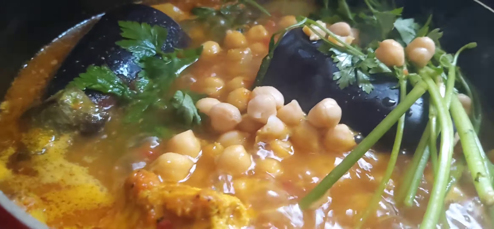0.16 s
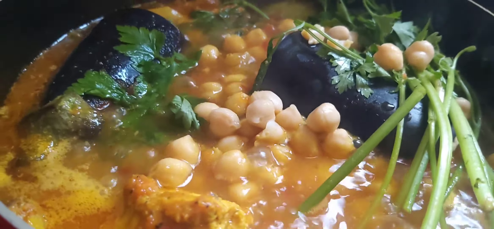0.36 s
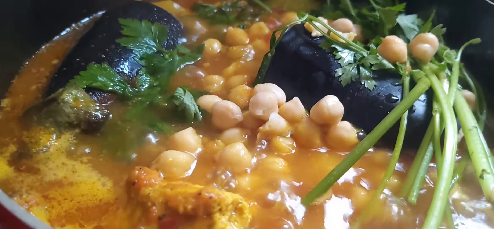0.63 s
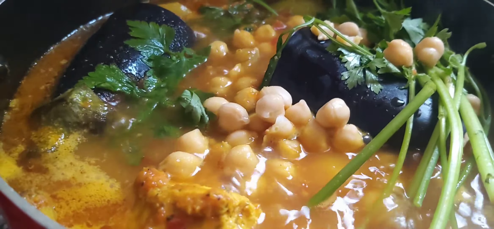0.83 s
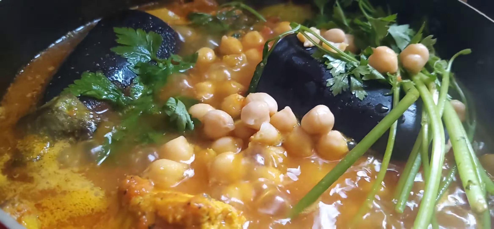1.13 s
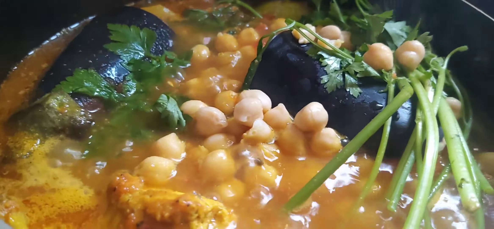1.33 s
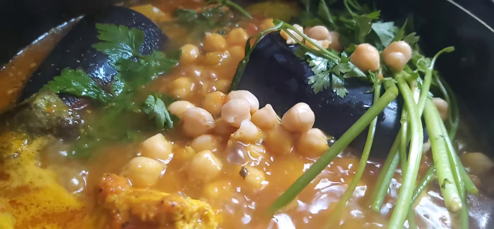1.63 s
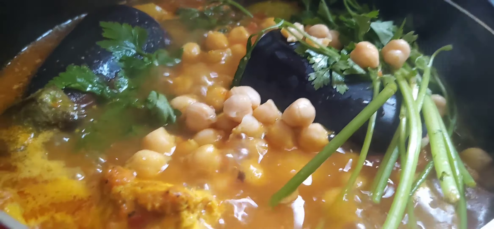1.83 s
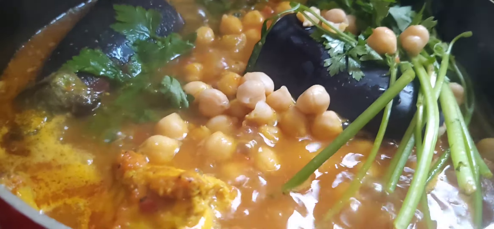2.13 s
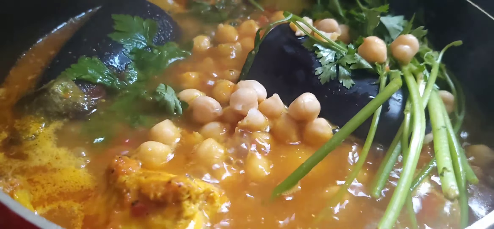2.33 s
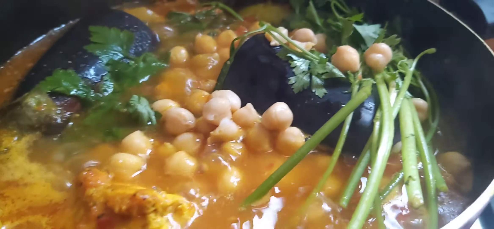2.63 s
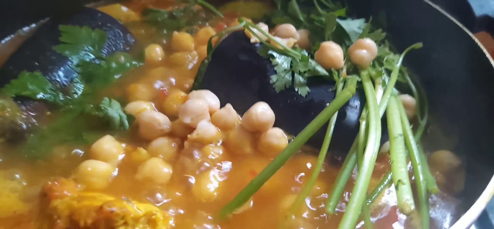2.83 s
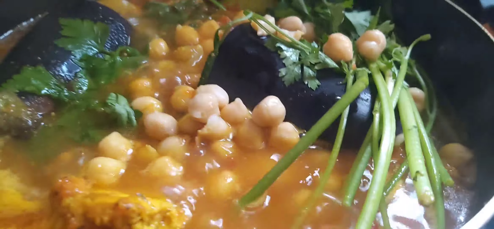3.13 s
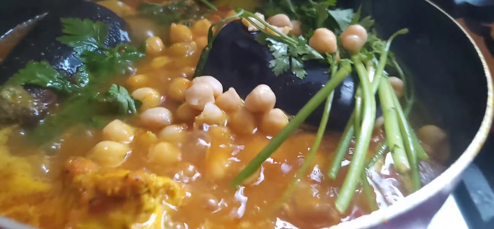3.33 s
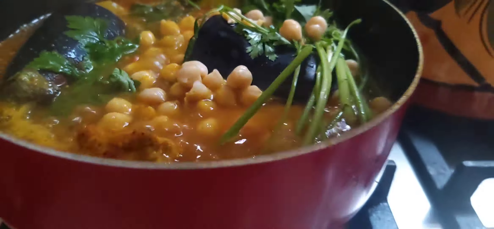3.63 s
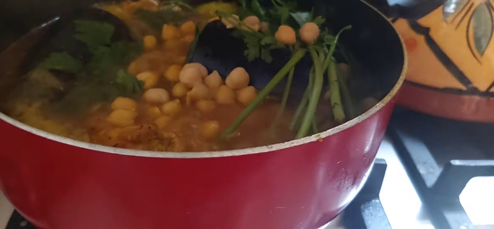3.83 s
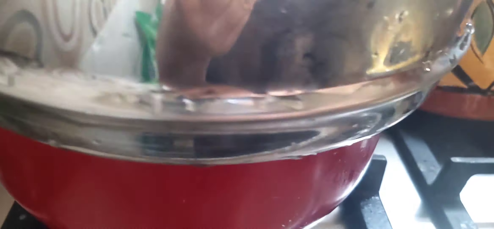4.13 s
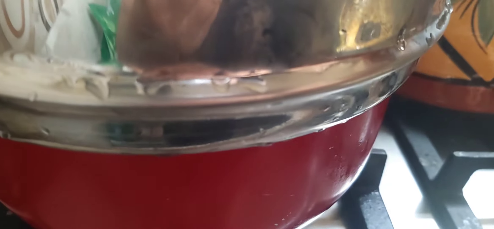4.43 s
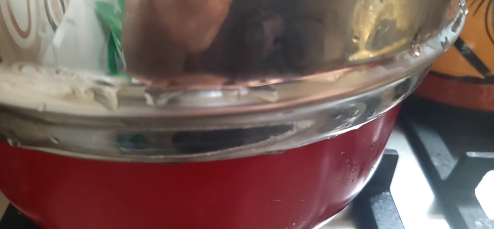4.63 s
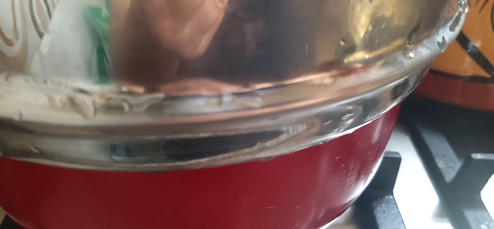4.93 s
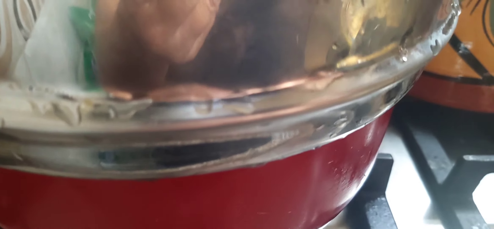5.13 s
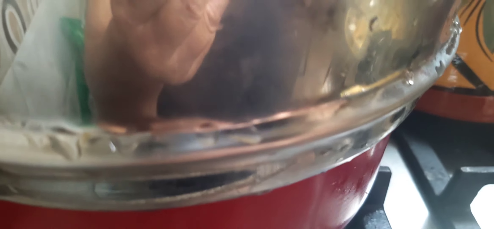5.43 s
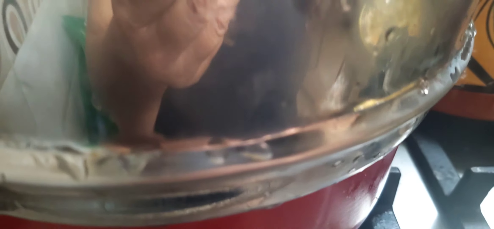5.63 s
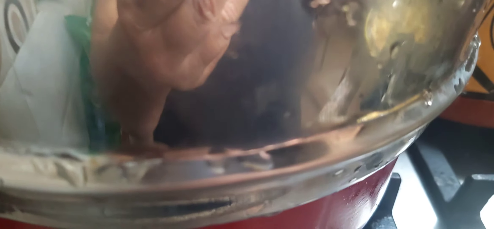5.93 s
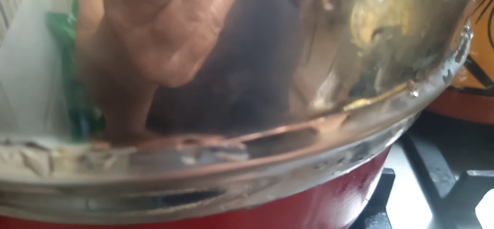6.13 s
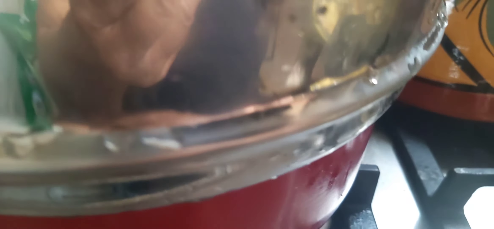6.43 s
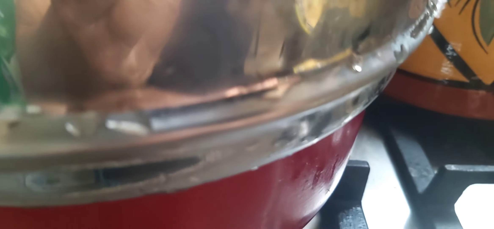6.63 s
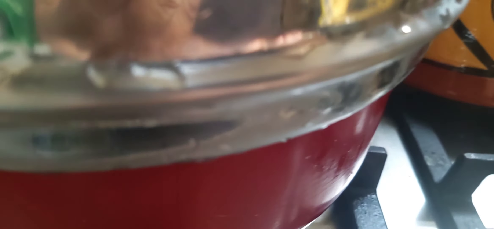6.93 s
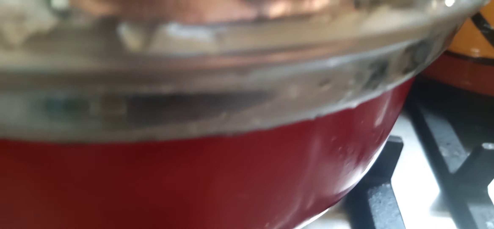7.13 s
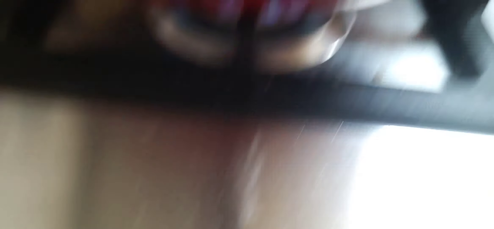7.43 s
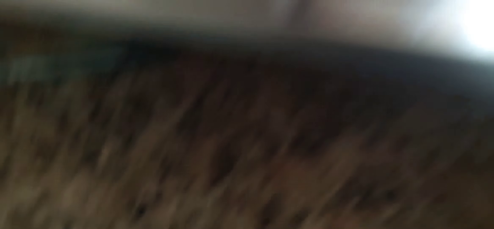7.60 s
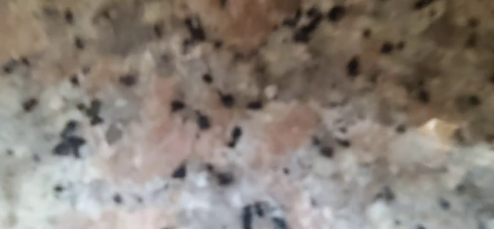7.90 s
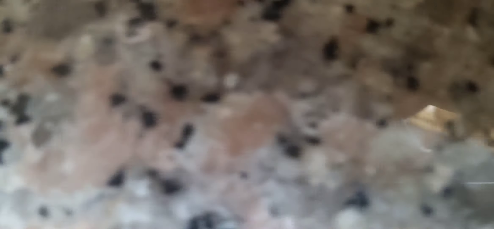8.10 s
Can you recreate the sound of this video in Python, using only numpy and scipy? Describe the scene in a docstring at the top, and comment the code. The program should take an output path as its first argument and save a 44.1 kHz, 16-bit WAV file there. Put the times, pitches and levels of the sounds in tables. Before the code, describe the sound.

A thick broth boils vigorously, very close, in a small kitchen with short tiled reflections. A dense bed of small bubbles, low churning and fine fizz runs throughout, with irregular wet plops, each a brief tone rising in pitch. Around 0.2 and 0.6-0.7 s steel slides faintly on steel; a light metallic knock comes at 1.6 s. At 1.96 s two or three very close blows make a hard, bright clank that dies within a quarter second. Soft grainy rubs and bumps follow at 2.5-2.7 s. At 4.12 s a steel steamer drops onto the pot: a loud, fuller clang with rapid rattling contacts, fainter taps at 4.25 and 4.35 s, and a short ring. Afterwards the boil is muffled, hollow and lower, its plops softer. From 7.3 s the microphone turns away, dulling the upper middle slightly, with faint handling rustles until the end at about 8.4 s.

```python
"""A pot of thick broth boils on a gas ring in a small kitchen: single bubbles plop over a dense simmer and fine fizz.
A steel steamer beside it is slid, knocked and taken up with a clank, then lands rattling on the pot.
The boil goes on below it, duller and hollower. Bubbles are short tones rising in pitch, the simmer thousands of them;
struck steel is a sum of decaying modes over noise, sliding steel noise through resonances."""
import sys
import numpy as np
from scipy import signal
from scipy.fft import rfft, irfft
from scipy.io import wavfile
from scipy.ndimage import uniform_filter1d

SR = 44100
rng = np.random.default_rng(int(sys.argv[2]) if len(sys.argv) > 2 else 0)


def generate_wav(sig):
    """Save sig (samples, or channels by samples) to the path in sys.argv[1] as 16-bit PCM at SR."""
    pcm = np.round(np.clip(np.atleast_2d(sig).T, -1, 1) * 32767).astype(np.int16)
    wavfile.write(sys.argv[1], SR, pcm)


N = 364266
T = np.arange(N) / SR
HZ = np.maximum(np.arange(N // 2 + 1) * SR / N, 1)
COVER_S = 4.12  # the steamer closes the pot

# biggest bubbles bursting: start_s, level_db, pitch_hz
BIG_PLOPS = [(0.047, -38, 800), (0.24, -30.5, 1600), (0.741, -29, 1720), (0.884, -37, 1470),
             (1.014, -31, 1360), (1.215, -38.5, 1280), (1.54, -32, 1450), (1.641, -30, 1470),
             (2.095, -30, 1200), (2.19, -34.5, 1400), (2.597, -28, 1500), (2.764, -30.5, 1270),
             (2.994, -36, 1370), (3.132, -32.5, 780), (3.147, -30.5, 1390), (3.316, -30, 1270),
             (3.528, -38.5, 1360), (3.653, -31.5, 1360), (3.78, -30.5, 1450), (3.912, -34.5, 880),
             (4.612, -32, 975), (4.784, -32.5, 963), (5.414, -37, 1185), (5.909, -37.5, 770),
             (6.06, -37.5, 1173), (6.138, -34.5, 1020), (6.284, -33.5, 1094), (6.529, -31.5, 1280),
             (6.704, -37, 1200), (6.758, -38, 910), (6.884, -34, 1074), (7.093, -32.5, 1050),
             (7.132, -39, 955), (7.71, -37, 1190)]
# left-right likeness of the sound field: frequency_hz, correlation (1 = alike)
EAR_LIKENESS = [(60, 1), (130, 0.99), (290, 0.84), (640, 0.65), (1400, 0.35), (3000, 0.12), (15000, 0.12)]
# dense weak modes of the steamer in the hand: frequency_hz, level_db (per Hz)
HELD_CLASH = [(60, -27), (110, -7.5), (240, -21), (700, -1.5), (1300, -6), (1900, -10.5), (2800, -3),
              (3700, -7), (4300, -23.5), (5200, -13), (5900, -21), (8500, -27), (9500, -32.5),
              (15500, -46.5)]
# their decay: frequency_hz, t60_s
HELD_DECAY = [(100, 0.28), (700, .24), (3000, .24), (12000, 0.23)]


def broth():
    """The boil, open at first, then closed in under the steamer."""
    # steady levels: churning_db, bubbling_db, fizz_db
    open_levels = (-50.5, -50.5, -62)
    covered_levels = (-50.5, -51.5, -64.5)
    # colour of the boil: frequency_hz, level_db (per Hz)
    open_colour = [(15, -47.5), (25, -10), (55, -17), (96, -4.5), (144, -10.5), (305, -9.5), (399, -11),
                   (457, -3), (523, -9.5), (1450, -10), (1710, -14), (4620, -14.5), (15500, -49)]
    covered_colour = [(15, -49.5), (25, -10), (64, -18), (96, -7.5), (140, -11.5), (209, -13.5), (313, -8),
                      (399, -2), (631, -6.5), (1240, -6), (1450, -15), (2120, -23), (15500, -65)]
    # air resonances of the pot: frequency_hz, width_hz, lift_db
    open_pot = [(106, 14, 4), (141, 43, 8), (488, 42, 2), (741, 59, 7.5), (2105, 350, 5)]
    covered_pot = [(105, 18, 6.3), (146, 18, 10), (436, 180, 7.7), (810, 150, 7), (2140, 450, 7.7),
                   (4700, 2100, 9.8), (7400, 700, 5)]
    close_s, right_lag_s = 0.1, 0.00015  # the broth is nearer the left ear

    bubbles = np.array([swarm(spread_db=4.0, gathered=gathered, count=2700) for gathered in (0.15, 0.2)])
    wash = rng.standard_normal((2, N))  # flame and far-off seething
    surging = kitchen(bubbles, wet_db=-1.5) * from_db(2 * drift(20))
    simmer = spread(surging + from_db(-3) * wash)
    enclosed = spread(kitchen(bubbles, wet_db=-4.0) + from_db(-4.5) * wash)
    # under the steamer the treble is wash rather than bubbles
    muffled = enclosed / (1 + (HZ / 1800) ** 2) + spread(wash) * HZ / (HZ + 1800)

    open_boil = boil(simmer, open_levels, open_colour, open_pot)
    covered_boil = boil(muffled, covered_levels, covered_colour, covered_pot)
    covered = np.clip((T - COVER_S) / close_s, 0, 1)
    left, right = moving_microphone((1 - covered) * open_boil + covered * covered_boil + plops())
    return np.array([left, np.interp(T - right_lag_s, T, right)])


def plops():
    """Big bubbles close by: a low gulp, the burst, its spatter and an echo off the pot wall."""
    out = np.zeros((2, N))
    for start_s, level_db, pitch_hz in [*BIG_PLOPS, *small_plops()]:
        pan_db, echo_s = rng.normal(0, 2.2), rng.uniform(0.003, 0.0063)
        height = from_db(level_db + 3.5 + np.array([[pan_db], [-pan_db]]))
        # in the closed pot the burst is muffled and its spatter rings longer
        burst_db, spatter_t60_s = (0, 0.049) if start_s < COVER_S else (-1.5, 0.096)
        burst = from_db(burst_db) * height * bubble(pitch_hz, cycles=11.3, rise=0.17)
        gulp = from_db(-10.0) * height * bubble(pitch_hz * 0.55, cycles=1.5, rise=0.27)
        add(out, start_s, burst)
        add(out, start_s - 0.001, gulp)
        add(out, start_s - 0.003, from_db(-8.0) * height * spatter(pitch_hz, spatter_t60_s))
        add(out, start_s + echo_s, from_db(-19.5) * burst)
    return kitchen(out, wet_db=-12)


def small_plops():
    """Lesser bursts at random, lower in pitch in the covered pot: rows of start_s, level_db, pitch_hz."""
    rate_per_s, level_db, spread_octaves = 5.3, -40.5, 0.49
    open_hz, covered_hz = 1300, 950
    rows = []
    for when, pitch in rng.random((int(rate_per_s * T[-1]), 2)):
        start_s = when * T[-1]
        middle_hz = open_hz if start_s < COVER_S else covered_hz
        rows.append((start_s, level_db, middle_hz * 2 ** (spread_octaves * (2 * pitch - 1))))
    return rows


def bubble(hz, cycles, rise):
    """The film tears, the cavity rings a few cycles and its pitch climbs as the hole widens."""
    age = np.arange(int(cycles * SR / hz) + 2) * hz / SR / cycles
    swell = age * np.exp(-10 * age)
    pitch_hz = hz * (1 + rise * (np.tanh(5 * age) - 0.6))
    return swell / swell.max() * np.sin(2 * np.pi * np.cumsum(pitch_hz) / SR)


def spatter(hz, t60_s):
    """Film and droplets falling back: a short rough noise around the bubble's pitch."""
    t = T[:SR // 8]
    band = signal.butter(2, [hz * 0.73, hz * 1.2], "band", fs=SR, output="sos")
    grains = rng.standard_normal((2, len(t))) * rng.exponential(1, len(t))
    return rms_one(signal.sosfilt(band, grains)) * from_db(-60 * t / t60_s) * (1 - np.exp(-t / 0.0027))


def swarm(spread_db, gathered, count):
    """Small bubbles of all sizes; a share gathers round the big bursts, the finest merge into hiss."""
    out = np.zeros(N)
    for when, size, force, chance, offset in rng.random((count, 5)):
        hz = 110 * 70 ** (size ** 0.8)
        if chance < gathered:
            start_s = BIG_PLOPS[int(when * len(BIG_PLOPS))][0] + 0.055 * (offset - 0.35)
        else:
            start_s = when * T[-1]
        gain = hz * from_db(-spread_db * np.log(force + 0.06))
        add(out, start_s, gain * bubble(hz, cycles=12.24, rise=0.3))
    heard = rfft(out)
    power = uniform_filter1d(np.abs(heard) ** 2, size=1200) / N
    even = heard / np.sqrt(power + 1e-9)  # equal power at every pitch
    merged = 1 / (1 + (6000 / HZ) ** 4)
    hiss = rfft(rng.standard_normal(N))
    return irfft(even * np.sqrt(1 - merged) + hiss * np.sqrt(merged), N)


def boil(source, levels_db, colour, pot):
    """The simmer takes the colour of the pot; churning, bubbling and fizz each have a steady level."""
    lift_db = sum(db * np.abs(peak(hz, width_hz)) ** 2 for hz, width_hz, db in pot)
    field = source * from_db(at_hz(colour, HZ) + lift_db)
    low, high = 1 / (1 + (HZ / 320) ** 4), 1 / (1 + (2200 / HZ) ** 4)
    cores_hz = [(80, 300), (350, 1000), (3000, 8000)]  # each level is set within its core
    out = 0
    for share, (from_hz, to_hz), db in zip([low, 1 - low - high, high], cores_hz, levels_db):
        core = irfft(field.mean(axis=0) * (HZ > from_hz) * (HZ < to_hz), N).std()
        out = out + field * share * from_db(db) / core
    return irfft(out, N)


def moving_microphone(x):
    """The boil grows with nearness and loses upper middle as the microphone turns to the worktop."""
    # level of the boil as the microphone moves: time_s, level_db
    nearness = [(0, -0.5), (1.8, 2.1), (3.2, -2), (4.0, -.5), (5.6, -.5), (7.0, 0.5), (8.2, .5)]
    turn_s, turn_length_s = 7.3, 0.54
    shade_db, shade_hz, shade_width_hz = -5, 1480, 2000
    turned = np.clip((T - turn_s) / turn_length_s, 0, 1)
    shade = from_db(shade_db * np.abs(peak(shade_hz, shade_width_hz)) ** 2)
    shaded = irfft(rfft(x) * shade, N)
    return from_db(np.interp(T, *np.transpose(nearness))) * (x + turned * (shaded - x))


def landing():
    """The steamer lands on the rim and rattles; steamer and full pot ring together."""
    # blows: start_s, level_db, brightness_db_per_octave
    blows = [(4.1175, -19, -3.5), (4.121, -16, 1.5), (4.140, -15.5, 0), (4.155, -20.5, 0.5),
             (4.178, -23, -0.5), (4.252, -30.5, -1), (4.3535, -28.5, 1.5)]
    # modes of the steamer, then of the full pot: frequency_hz, level_db, t60_s (limited in clank)
    steamer_modes = [(108, -18.5, 0.52), (140.56, -13.5, 0.56), (848, -13, 0.63), (907, -5.5, .36),
                     (1279, 3, 0.24), (1556, -12.5, 0.39), (1730, -11.5, .32), (1994, -11, 0.36),
                     (2033, 0.5, 0.29), (2160, -3, .23), (2930, -3, 0.26), (3240, -31, 0.24),
                     (3580, -11, 0.19), (3760, -4, 0.25), (4150, -9.5, 0.24), (4340, -20, .3),
                     (4500, -9, .29), (4700, -13.5, .25), (5100, -12.5, 0.14), (5440, -11.5, 0.18),
                     (6487, -29, .3), (7330, -27, 0.28)]
    pot_modes = [(252.6, -12, 0.31), (303.4, -15.5, 0.33), (431, 1, 0.14), (1014, -14, 0.8),
                 (1155, -17.5, 1), (1181, -11, 0.79)]
    # dense weak modes: frequency_hz, level_db (per Hz)
    clash = [(30, -30), (65, -15), (117, -12.5), (200, -7.5), (440, -3.5), (620, -12.5), (950, -2.5),
             (1300, -8.5), (1700, -10.5), (2200, -7.5), (2700, -13.5), (3900, -12), (5400, -14.5),
             (7000, -20), (10000, -29), (15500, -36)]
    # their decay: frequency_hz, t60_s
    decay = [(100, 0.63), (700, 0.49), (3000, 0.36), (12000, 0.17)]
    return clank(blows, [*steamer_modes, *pot_modes], clash, decay,
                 modes_db=2, clash_db=3.5, cluster_db=-2.5, cluster_width=0.016)


def lift():
    """The steamer is knocked and taken up: close blows set its steel ringing."""
    # blows: start_s, level_db, brightness_db_per_octave
    blows = [(1.955, -16, 0), (1.9645, -17.5, -2), (1.969, -22, 4)]
    # modes: frequency_hz, level_db, t60_s
    modes = [(648, -1.5, 0.058), (939, -7, 0.18), (1223, -8, 0.093), (1520, -10.5, 0.19), (2579, 1.5, .22),
             (2990, -17, .2), (3260, -13, .22), (3160, -14.5, 0.12), (3660, -9, 0.23), (3805, -3.5, .24),
             (5044, -4, 0.18), (5430, -19, 0.22), (6428, -18, 0.19), (7220, -18.5, 0.23),
             (7660, -24.5, 0.2), (10130, -23, .21), (11000, -29.5, 0.26), (11550, -33, .18)]
    return clank(blows, modes, HELD_CLASH, HELD_DECAY,
                 modes_db=-4.0, clash_db=4.5, cluster_db=4.5, cluster_width=0.031)


def knock():
    """A light knock before the steamer is taken up excites fewer modes."""
    # blows: start_s, level_db, brightness_db_per_octave
    blows = [(1.575, -30.5, 2.8), (1.583, -54, 3.5)]
    # modes: frequency_hz, level_db, t60_s
    modes = [(913, -0.5, 0.21), (1467, -0.5, 0.16), (2240, -1, 0.17), (2460, 2.5, 0.12), (3540, -4, .2),
             (3650, -22, 0.16), (5040, -14, 0.24), (5680, -12.5, 0.11)]
    return clank(blows, modes, HELD_CLASH, HELD_DECAY,
                 modes_db=-6, clash_db=-9.0, cluster_db=3.0, cluster_width=0.11)


def clank(blows, modes, clash, decay, modes_db, clash_db, cluster_db, cluster_width):
    """Struck cookware: strong modes, each amid a cluster of close ones, over a wash of dense weak modes."""
    wash = sum(band * ringing(blows, hz, at_hz(decay, hz)) for hz, band in octaves(clash, size=SR))
    out = from_db(clash_db) * wash
    field, grid_hz = spread(rng.standard_normal((2, SR))), np.linspace(1, SR / 2, SR // 2 + 1)
    for hz, db, t60_s in modes:
        # phase between the ears
        apart = rng.choice([-1, 1]) * np.arccos(np.clip(at_hz(EAR_LIKENESS, hz), -1, 1))
        phase = rng.uniform(0, 2 * np.pi) + np.array([[0], [apart]])
        tone = np.sin(2 * np.pi * hz * T[:SR] + phase) * ringing(blows, hz, min(t60_s, 0.8))
        cluster = rms_one(irfft(field / (1 + (2 * (grid_hz / hz - 1) / cluster_width) ** 2)))
        beats = from_db(cluster_db) * cluster * ringing(blows, hz, min(t60_s, at_hz(decay, hz)))
        out += from_db(db + modes_db) * (tone + beats)
    track = np.zeros((2, N))
    add(track, blows[0][0], out)
    return track


def ringing(blows, hz, t60_s):
    """Height of a vibration from the first blow on: each blow adds energy, which then leaks away."""
    spread_s = 0.002  # time constant of a blow spreading through the metal
    start_s, db, bright_db = np.transpose(blows)
    at = np.clip((start_s - start_s[0]) * SR, 0, SR - 1).astype(int)
    energy = np.bincount(at, from_db(db + bright_db * np.log2(hz / 1500)) ** 2, SR)
    keep = np.exp(-1 / (spread_s * SR))
    energy = signal.lfilter([1 - keep], [1, -keep], energy + 1e-30)
    leak = np.exp(-2 * np.log(1000) / (t60_s * SR))
    return np.sqrt(signal.lfilter([1], [1, -leak], energy))


def slides():
    """Tiny slips of steel on steel excite the rim's resonances, or one high one in a scuff."""
    # strokes: peak_s, length_s, level_db
    strokes = [(0.197, 0.041, -39), (.59, 0.019, -45), (0.642, 0.027, -40.5), (.694, 0.02, -31.5)]
    # rim resonances: frequency_hz, width_hz, level_db
    rim_modes = [(976, 33, 0), (1093, 25, 3), (1420, 65, -3.5), (2170, 66, 2.5), (2370, 39, -23),
                 (3150, 45, -22), (4560, 190, -39)]
    scuff_s, scuff_length_s, scuff_db, scuff_hz = 2.585, 0.041, -42.5, 4220

    slips = rfft(rng.standard_normal((2, N)) * from_db(1.4 * drift(160)))
    rim = sum(from_db(db) * peak(hz, width_hz) for hz, width_hz, db in rim_modes) / (1 + (HZ / 7000) ** 4)
    pressure = sum(from_db(db) * stroke(T - peak_s, length_s) for peak_s, length_s, db in strokes)
    rubbed = rms_one(irfft(slips * rim, N)) * pressure
    squeak = rms_one(irfft(slips * peak(scuff_hz, width_hz=1400) ** 2, N))
    scuff = from_db(scuff_db) * stroke(T - scuff_s, scuff_length_s) * squeak
    return kitchen(rubbed + scuff, wet_db=-9.5)


def shuffles():
    """Grainy rubs and dull bumps of handling: coloured noise in short swells."""
    # rubs: peak_s, length_s, level_db, brightness_db_per_octave
    rubs = [(0.646, 0.099, -49.5, 3.5), (1.331, 0.018, -48, 5), (1.511, 0.022, -49.5, 6),
            (2.476, 0.049, -44, 3.5), (2.527, 0.023, -34.5, -0.5), (2.572, 0.053, -37.5, 0.5),
            (2.673, 0.035, -38, 2), (2.699, 0.064, -40, 1), (7.328, 0.018, -47.5, -3),
            (7.546, 0.048, -47, 0.5), (8.123, 0.063, -53, -3.5)]
    # colour: frequency_hz, level_db (per Hz)
    colour = [(50, -10), (110, 4), (300, -1), (700, -5.5), (2000, -11), (4400, -18), (7000, -32.5),
              (15000, -61)]
    out = np.zeros((2, N))
    for peak_s, length_s, db, bright_db in rubs:
        bands = octaves(colour, size=SR)
        rub = sum(band * from_db(db + bright_db * np.log2(hz / 1000)) for hz, band in bands)
        add(out, peak_s - 0.5, rub * stroke(T[:SR] - 0.5, length_s))
    return kitchen(out * from_db(2.3 * drift(120)), wet_db=-6.5)


def stroke(t, length_s):
    """Pressure of a hand movement, swelling and easing around t = 0."""
    return np.exp(-2 * np.minimum(np.abs(t) / length_s, 10) ** 2)


def wall_echoes(x, echo_db, count):
    """Short reflections between the pot walls ripple the spectrum."""
    lags_s = rng.uniform(0.001, 0.0098, count)
    echoes = sum(rng.choice([-1, 1]) * np.roll(x, int(lag_s * SR), axis=1) for lag_s in lags_s)
    highpass = signal.butter(2, 900, "high", fs=SR, output="sos")  # long waves pass round the wall
    return x + from_db(echo_db) * signal.sosfilt(highpass, echoes)


def kitchen(x, wet_db):
    """Direct sound plus a dense tail from tiles and worktop, different at each ear."""
    t60_s = 0.2
    t = T[:SR // 3]
    tail = rng.standard_normal((2, len(t))) * from_db(-60 * t / t60_s) * (t > 0.003)
    tail /= np.sqrt(np.sum(tail ** 2, axis=1, keepdims=True))
    return x + from_db(wet_db) * signal.fftconvolve(np.broadcast_to(x, (2, N)), tail, axes=1)[:, :N]


def microphone_hiss():
    """The microphones' own noise: white, unrelated left and right."""
    return from_db(-75) * rng.standard_normal((2, N))


def microphones(x):
    """Each microphone colours the sound in its own way."""
    # difference in colour: frequency_hz, left_minus_right_db
    balance = [(60, 0), (200, 1), (330, -3), (600, 1.5), (1200, 0.5), (2400, 0), (4800, -2.1), (8100, 7),
               (15000, -2.5)]
    return irfft(rfft(x) * from_db(at_hz(balance, HZ) * np.array([[0.5], [-0.5]])), N)


def gain_control(x):
    """A loud sound turns the gain down by a limited amount; it recovers as the held level falls."""
    above_db, depth_db, release_db_per_s, window_s = -27.5, 4, 18, 0.0055
    power = uniform_filter1d(np.mean(x ** 2, axis=0), size=int(window_s * SR))
    level_db = 10 * np.log10(np.maximum(power, 1e-12))
    fall_db = release_db_per_s * T
    held_db = np.maximum.accumulate(level_db + fall_db) - fall_db
    return x * from_db(-np.clip(held_db - above_db, 0, depth_db))


def from_db(db):
    """Decibels to gain."""
    return np.exp(np.asarray(db) * (np.log(10) / 20))


def rms_one(x):
    """Scale to unit power."""
    return x / np.sqrt(np.mean(x ** 2) + 1e-20)


def at_hz(points, hz):
    """Read a table on a log-frequency axis."""
    points = np.array(points)
    return np.interp(np.log(hz), np.log(points[:, 0]), points[:, 1])


def add(track, start_s, sound):
    """Mix a short sound in at a time."""
    start = int(np.clip(start_s * SR, 0, N - 1))
    track[..., start:start + sound.shape[-1]] += sound[..., :N - start]


def drift(rate_hz):
    """Smooth random curve of unit power, slower than about rate_hz."""
    return rms_one(irfft(rfft(rng.standard_normal(N)) / (1 + (HZ / rate_hz) ** 4), N))


def peak(hz, width_hz):
    """Complex response of one resonance, 1 on top."""
    return 1 / (1 + 1j * (HZ ** 2 - hz ** 2) / (HZ * width_hz))


def spread(pair):
    """Spectra of a sound field from two signals: alike in the bass, unlike in the treble."""
    mid, side = rfft(pair)
    alike = np.clip(at_hz(EAR_LIKENESS, np.linspace(1, SR / 2, len(mid))), -1, 1)
    return np.sqrt(1 + alike) * mid + np.sqrt(1 - alike) * side * [[1], [-1]]


def octaves(colour, size):
    """Coloured stereo noise of unit power, split into (centre Hz, band) pairs."""
    grid_hz = np.linspace(1, SR / 2, size // 2 + 1)
    field = spread(rng.standard_normal((2, size))) * from_db(at_hz(colour, grid_hz))
    field = field / irfft(field).std()
    centres_hz = 100 * 2.0 ** np.arange(8)
    pairs = []
    for hz, own in zip(centres_hz, np.eye(len(centres_hz))):
        share = np.interp(np.log(grid_hz), np.log(centres_hz), own)
        pairs.append((hz, irfft(field * share)))
    return pairs


def scene():
    """The boil and the handling of the cookware."""
    near_pot = wall_echoes(broth() + slides() + shuffles(), echo_db=-19.5, count=6)
    return near_pot + landing() + lift() + knock() + microphone_hiss()


def record(dry):
    """Microphone colour, ducking after loud sounds, rounding of the loudest peaks, top cut."""
    ducked = gain_control(microphones(dry))
    rounded = 1.157 * np.tanh(ducked / 1.242)
    lowpass = signal.ellip(10, 0.1, 80, 15750, fs=SR, output="sos")
    return signal.sosfilt(lowpass, rounded)


dry = scene()
out = record(dry)
generate_wav(out)
```